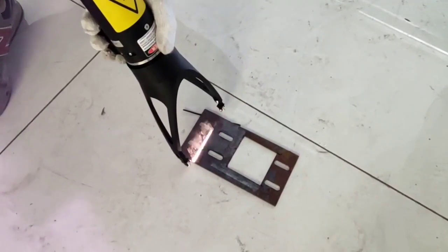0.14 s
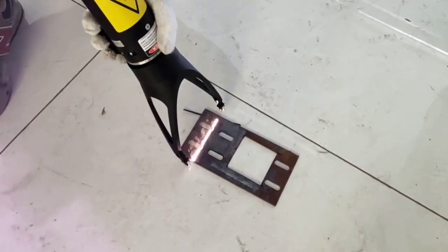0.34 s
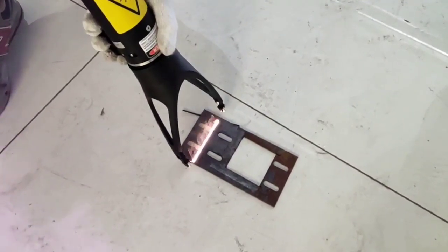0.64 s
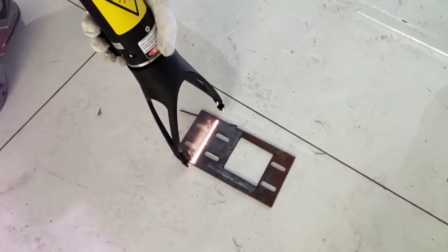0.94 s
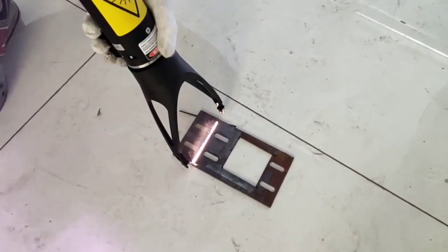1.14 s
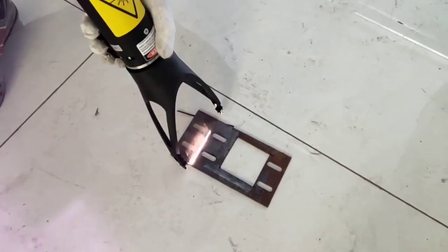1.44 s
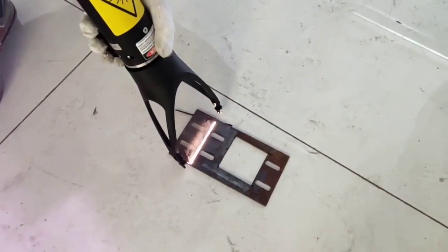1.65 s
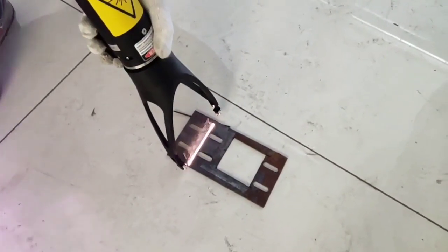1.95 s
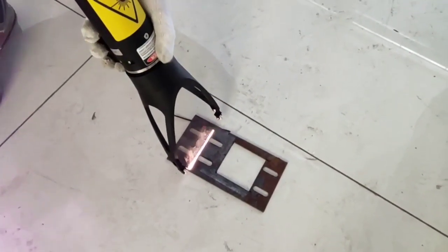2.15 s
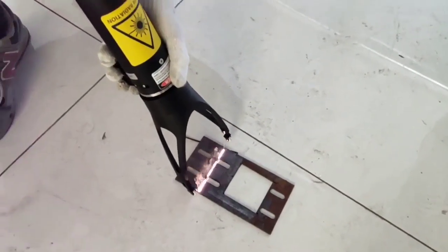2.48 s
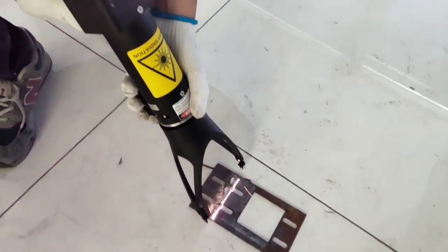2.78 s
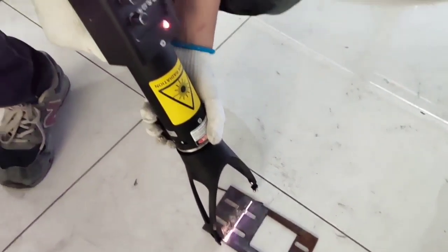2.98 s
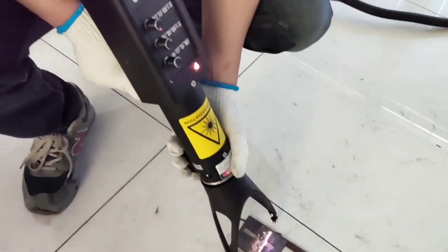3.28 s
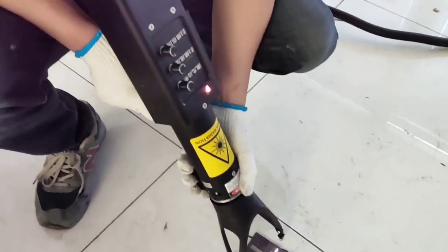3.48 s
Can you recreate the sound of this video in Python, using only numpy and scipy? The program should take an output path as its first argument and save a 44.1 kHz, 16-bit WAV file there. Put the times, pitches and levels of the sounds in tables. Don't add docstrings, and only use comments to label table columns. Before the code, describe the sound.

A laser cleaner makes a bright, raspy low-pitched buzz with hissing crackle on rusty metal, sharp pops scattered through, then thins to fast ticking; close stereo microphone in a hard-floored room.

```python
import sys
import numpy as np
from scipy import signal
from scipy.fft import rfft, irfft, next_fast_len
from scipy.io import wavfile
from scipy.ndimage import uniform_filter1d, map_coordinates

SR = 44100
rng = np.random.default_rng(int(sys.argv[2]) if len(sys.argv) > 2 else 0)


def invert_db(x):
    u = np.asarray(x, float) / 20
    return 10 ** u


def store_pcm(level_fs):
    pcm = np.round(np.clip(level_fs, -1, 1) * 32767).astype(np.int16)
    wavfile.write(sys.argv[1], SR, np.atleast_2d(pcm).T)


N = 159642
T = np.arange(N) / SR
SWEEP_HZ = 64.63
SIDES = np.array([[.5], [-.5]])


def rms_one(x):
    return x / np.sqrt(np.mean(x ** 2) + 1e-20)


def in_time(rows):
    s, *columns = np.transpose(rows)
    return [np.interp(T, s, c) for c in columns]


def at_hz(points, hz):
    f, *columns = np.transpose(points)
    return [np.interp(np.log(hz + 1), np.log(f), c) for c in columns]


def between(t, start, end, fade):
    return np.clip(np.minimum(t - start, end - t) / fade + .5, 0, 1)


def drift(rate_hz):
    r = np.exp(-80 * np.pi * rate_hz / SR)
    noise = rng.standard_normal(N // 40 + 2002)
    slow = signal.lfilter([1], [1, -2 * r, r * r], noise)[2000:]
    return np.interp(np.arange(N) / 40, np.arange(len(slow)), rms_one(slow))


def ring(clicks, hz, t60):
    r, w = invert_db(-60 / (t60 * SR)), 2 * np.pi * hz / SR
    return signal.lfilter([0, np.sin(w)], [1, -2 * r * np.cos(w), r * r], clicks + 1e-18)


def high_pass(x, order, hz):
    return signal.sosfilt(signal.butter(order, hz, "high", fs=SR, output="sos"), x)


def sweeps(hz, memory):
    memory = np.clip(memory, 0, .97)
    return np.sqrt(1 - memory ** 2) / (1 - memory * np.exp(-2j * np.pi * hz / SWEEP_HZ))


def rust_crackle(hz, size):
    # f/Hz, memory [0-1], share that repeats [0-1]
    repeat = [(600, .82, .75), (1200, .78, .7), (2600, .7, .65), (5200, .56, .78), (8000, .4, .95),
              (12000, .2, .8)]
    memory, share = at_hz(repeat, hz)
    white = rfft(rng.standard_normal((7, size)))
    repeated = np.sqrt(share) * sweeps(hz, memory) * white[:3]
    rust = repeated + np.sqrt(1 - share) * white[3:6]
    spots = white[6] * sweeps(hz, .97) * (hz > 30) / (1 + (hz / 580) ** 2)
    spots_db = 1 * rms_one(irfft(spots, size))
    t = np.arange(size) / SR
    turn = 2 * np.pi * SWEEP_HZ * t
    swing_db = 1.24 * np.cos(turn - 2.9) + 0.44 * np.cos(2 * turn - 4.3)
    swing_db += 4.5 * np.cos(turn - 5.4) * np.clip((t - 3.26) / 0.14, 0, 1)
    return rfft(irfft(rust, size) * invert_db(spots_db + swing_db))


def plate_at_ports(rust, hz, size):
    # f/Hz, shared share [0-1], left lead [rad], left-right level/dB
    ports = [(290, 1, -7.5, -3), (674, 0.69, -5, 8), (1088, 0.73, 2.1, -3.5), (1954, 0.22, 4, -2),
             (2294, 0.94, 6, 2), (3950, 0.53, 8, 7), (7670, 0.22, 6.5, -2), (12500, 0.03, 6.5, 1)]
    # f/Hz, level per Hz [dB]
    crackle = [(300, -32), (800, -32.5), (1700, -21.5), (3600, -17), (6000, -4), (8200, -2.5), (10300, -13),
               (14500, -21)]
    # f/Hz, width/Hz, boost/dB
    body = [(577, 61, 6.5), (1034, 230, 12), (1455, 99, 9), (2110, 182, 9.5), (2784, 253, 6.5),
            (7920, 990, 3.5), (11830, 3980, 9)]
    alike, lead, tilt_db = at_hz(ports, hz)
    alike = np.clip(alike, 0, 1)
    shared = np.sqrt(alike) * rust[0] * np.exp(1j * lead * SIDES)
    pair = (shared + np.sqrt(1 - alike) * rust[1:]) * invert_db(tilt_db * SIDES)
    colour_db = at_hz(crackle, hz)[0]
    for f, width, boost_db in body:
        colour_db = colour_db + boost_db / (1 + (2 * (hz - f) / width) ** 2)
    pair = pair * invert_db(colour_db) / (1 + (250 / (hz + 1)) ** 6)
    return pair / np.sqrt(np.mean(irfft(pair.mean(axis=0), size) ** 2))


def burn():
    # t/s, level/dB, plate body share/dB, top sizzle share/dB, left-right/dB, nozzle ring/dB
    burn_curve = [(0.0, -39.5, 8, 5, -9.5, 0.5), (0.07, -30.5, 2, 1.5, -5, 1),
                  (0.37, -28, 4.5, 3.5, -3.5, -0.3), (0.44, -24, 2.5, 2.5, -4.5, -0.5),
                  (0.84, -24, 1.5, -1.5, -3.5, -0.3), (1.02, -26.5, -1.5, 1.5, -3.5, -0.9),
                  (1.28, -23.5, -0.5, 0, -4.5, 0.5), (1.68, -25.5, -2.5, 1, -4, -1.6),
                  (1.74, -24.5, -1, 0.5, -5.5, 0.1), (2.08, -25.5, -0.5, -2, -3.5, 2.2),
                  (2.49, -27, 0.5, -1.5, -5.5, 4), (2.82, -29, 0, -3.5, -4.5, 0.6),
                  (2.89, -33.5, 0.5, -2.5, -4.5, 3.5), (3.04, -32, -2.5, -0.5, -5.5, 0.5),
                  (3.13, -29.5, -1, 0, -6.5, 3), (3.34, -43, 5, 6, -4.5, 5), (3.53, -50, 1.5, 2, -6.5, 4.5),
                  (3.62, -34, -1.5, -6, -11.5, 1)]
    size = next_fast_len(N)
    hz = np.arange(size // 2 + 1) * SR / size
    pair = plate_at_ports(rust_crackle(hz, size), hz, size)
    level_db, body_db, top_db, pan_db, ring_db = in_time(burn_curve)
    together = drift(5.0)
    step = np.log2((hz + 1) / 200) * 3
    out = 0
    for k in range(1, 20):
        centre = 200 * 2 ** (k / 3)
        low = 1 / (1 + (centre / 3500) ** 4)
        top = 1 / (1 + (10000 / centre) ** 8)
        gain_db = low * body_db + top * top_db + (1 - low) * pan_db * SIDES - 0.24 * together
        own_db = 2 * (0.53 + low) * np.array([drift(5.5), drift(5.7)])
        band = irfft(pair * np.clip(1 - abs(step - k), 0, 1), size)[:, :N]
        out = out + invert_db(gain_db + own_db) * band
    nozzle_shape = 1 / (1 + (2 * (hz - 7950) / 1300) ** 4)
    nozzle = irfft(rfft(out, size) * nozzle_shape, size)[:, :N]
    return invert_db(level_db - 2.5) * (out + (invert_db(ring_db) - 1) * nozzle)


def echoes(x):
    bounces = [
        (.62, 0.445, 0.0083, -15.5),
        (1.35, 1.7, -0.042, -8),
        (2.9, 2.3, 0.0627, -9),
        (4.7, 6.2, -0.0763, -6),
        (7.9, 9.2, 0.0885, -4),
    ]
    out = x.copy()
    bright = high_pass(x, 1, 960)
    for left, right, slide, db in bounces:
        for k, lag in enumerate((left, right)):
            at = (T - (lag + slide * T) / 1000) * SR
            out[k] += invert_db(db) * map_coordinates(bright[k], [at], order=1, mode="mirror")
    return out


def air():
    # f/Hz, level per Hz [dB]
    rumble = [(18, -45), (36, -6), (80, 1), (140, -3.5), (250, -2.5), (450, -8), (900, 0), (1300, -40)]
    hz = np.arange(N // 2 + 1) * SR / N
    mid, side = irfft(rfft(rng.standard_normal((2, N))) * invert_db(at_hz(rumble, hz)[0]), N)
    early_db = 4 * between(T, -1, .66, .05)
    return invert_db(-66.5 + early_db) * rms_one(mid + 0.36 * side * SIDES)


def dapple(x):
    # f/Hz, depth/dB
    depths = [(100, 3), (400, 5), (1200, 3), (2200, 5), (3900, 7.5), (5400, 2.5), (10000, 1.5), (14000, 4)]
    # start t/s, end t/s, f/Hz, width/Hz
    nulls = [(.32, .53, 1800, 200), (.79, .87, 1780, 320), (.94, 1.08, 1800, 180), (2.06, 2.2, 1750, 150),
             (2.28, 2.55, 1820, 220), (2.5, 2.64, 1700, 220), (2.7, 2.88, 1810, 150), (2.7, 3.2, 1570, 170),
             (3.44, 3.62, 1560, 220), (2.21, 2.31, 520, 240), (.15, .55, 770, 90), (.8, 1.2, 780, 90),
             (2.4, 2.55, 780, 90), (2.72, 2.85, 770, 90), (3.05, 3.13, 3300, 220), (3.05, 3.17, 3750, 200),
             (3.17, 3.28, 2800, 180), (3.35, 3.5, 3400, 200), (3.46, 3.62, 4170, 260), (.43, .5, 3250, 250),
             (.81, .92, 3650, 220), (1.33, 1.43, 3600, 350), (.36, .47, 1270, 120), (1.0, 1.15, 450, 90),
             (1.13, 1.53, 350, 90), (2.28, 2.5, 4200, 200), (2.85, 3.15, 330, 90), (3.33, 3.4, 2400, 200),
             (.02, .2, 2400, 200)]
    hz, s, cells = signal.stft(x, SR, nperseg=1024)
    null = 0
    for start, end, f, width in nulls:
        null = null + between(s, start, end, .03) / (1 + (2 * (hz[:, None] - f) / width) ** 6)
    cells = cells - .93 * np.minimum(null, 1) * cells.mean(axis=0)
    field = rng.standard_normal((3,) + cells.shape[1:])
    for axis, size in ((1, 3), (2, 7), (2, 5)):
        field = uniform_filter1d(field, size=size, axis=axis)
    field = rms_one(field[0] + .6 * field[1:])
    field = np.minimum(field, .4)
    late = 1 + 1.2 * np.clip(s - 2.7, 0, 1)
    depth_db = at_hz(depths, hz)[0][:, None] * late
    return signal.istft(cells * invert_db(depth_db * field), SR, nperseg=1024)[1][:, :N]


def locks():
    partials = [(9, 0.29, 0.65, -59, 0.61), (11, 1.5, 2.26, -65.5, .3), (10, 2.5, 2.77, -64, 0.66),
                (15, .0, 0.9, -55.5, 1), (15, 0.83, 1.22, -60.5, 0.82), (15, 2.05, 2.16, -56, 1.3),
                (15, 3.5, 3.7, -63.5, 1.8), (17, 0.32, 0.86, -52.5, 0), (14, 0.5, 0.735, -65, 1),
                (32, -0.2, 2.8, -58, 0.63), (27, 3.5, 3.44, -60, 1.9), (18, 2.5, 2.55, -63, 0.9),
                (13, 0.27, 0.63, -63, 0.2), (17, 1.9, 2.04, -61, .4), (14, 2, 2.9, -62, 1),
                (14, 3, 3.43, -68, 1.1), (22, 2, 2.49, -58.5, 0.42), (24, 0.85, 1.7, -63.5, .6),
                (9, 2.5, 2.93, -68, .9), (45, 3, 3.33, -58.5, 0.99)]
    out = 0
    for multiple, start, end, db, lead in partials:
        shape = between(T, start, end, min(.15, end - start))
        turn = 2 * np.pi * multiple * SWEEP_HZ * T + .8 * drift(8.9)
        level = invert_db(db + 3.5 + 3 * drift(9.8))
        out = out + shape * level * np.sin(turn + lead * SIDES)
    return out


def machine():
    # start t/s, end t/s, level/dB
    swells = [(-.1, 0.134, -62.5), (.22, 0.325, -57), (0.435, .5, -58), (0.526, 0.58, -56.5),
              (.635, 0.67, -63), (0.743, 0.884, -55.5), (0.945, 1.06, -58.5), (1.17, 1.41, -63.5),
              (1.526, 1.679, -57.5), (1.853, 1.95, -58.5), (1.987, 2.12, -58), (2.143, 2.208, -64),
              (2.306, 2.37, -61), (2.457, 2.645, -53.5), (2.687, 2.94, -54.5), (2.974, 3.21, -56.5),
              (3.32, 3.43, -66.5), (3.442, 3.573, -56.5)]
    swell = invert_db(-74)
    for start, end, db in swells:
        swell = swell + invert_db(db) * between(T, start, end, .035)
    swell = swell * invert_db(1.5 * drift(9.0) - 1)
    waver = drift(2.5)
    fan_hz = 140.3 + 1.2 * (waver - waver.mean())
    turn = 2 * np.pi * np.cumsum(fan_hz) / SR
    fan = np.sqrt(2) * swell * (np.sin(turn) + invert_db(-20) * np.sin(2 * turn))
    mirror = invert_db(-79) * np.sin(4 * np.pi * SWEEP_HZ * T)
    return (fan + mirror) * invert_db(3 * SIDES)


def pops():
    # t/s, peak level/dB, left-right/dB
    flakes = [(.3786, -20, 3), (.493, -11, -4), (0.8103, -6, -4), (1.4752, -11, 1), (1.8946, -12, -8),
              (2.292, -17, -9.5), (2.436, -16.5, -7), (2.7763, -13, -11), (2.8763, -15, -9),
              (3.0156, -13.5, -9), (3.063, -15, -7), (3.2827, -25, -6)]
    s, db, pan_db = np.transpose(flakes)
    clicks = np.zeros((2, N))
    clicks[:, (s * SR).astype(int)] = invert_db(db + .5 + pan_db * SIDES)
    return high_pass(ring(clicks, 7600, .0018), 2, 4000)


def bump():
    click = np.zeros(N)
    click[int(2.1062 * SR)] = invert_db(-23.5)
    soft = signal.lfilter([.1], [1, -.9], ring(click, 242, 0.0099))
    return high_pass(soft, 1, 110) * invert_db(np.array([[-30], [0]]))


def edge():
    # t/s, peak level/dB
    tick_curve = [
        (2.2, -43),
        (2.5, -20),
        (3.0, -40),
        (3.3, -23),
        (3.44, -27),
        (3.47, -28),
        (3.5, -23.5),
        (3.54, -28),
        (3.58, -22),
    ]
    # f/Hz, level/dB, t60 [s]
    tick_modes = [(8900, -6, .006), (7100, -8, .005), (12000, -16, .003)]
    s = 3.4802 + np.arange(-84, 9) / 64.58
    at = (s * SR).astype(int)
    clicks = np.zeros(N)
    clicks[at] = invert_db(in_time(tick_curve)[0][at] + 1.3 * rng.standard_normal(len(at)))
    tick = sum(invert_db(db) * ring(clicks, hz, t60) for hz, db, t60 in tick_modes)
    return high_pass(tick, 4, 4500) * invert_db(np.array([[-9], [3]]))


def scene():
    dappled = dapple(echoes(burn()) + air())
    return dappled + locks() + machine() + pops() + bump() + edge()


def low_pass(x):
    return signal.sosfilt(signal.butter(12, 14300, fs=SR, output="sos"), x)


def record(dry):
    return low_pass(dry)


dry = scene()
out = record(dry)
store_pcm(out)
```